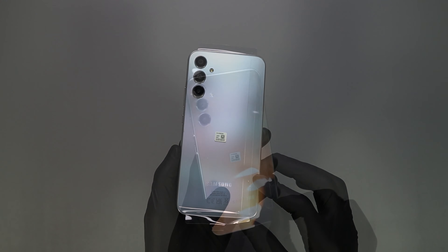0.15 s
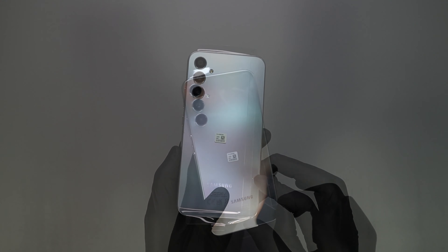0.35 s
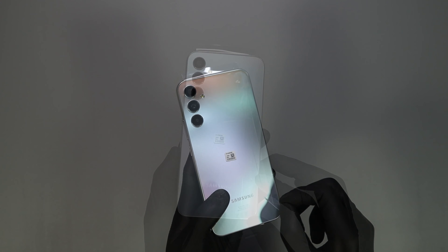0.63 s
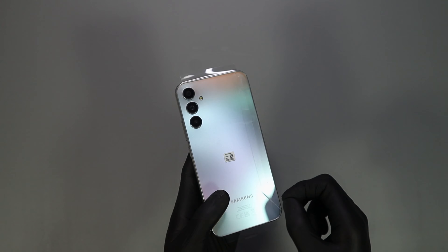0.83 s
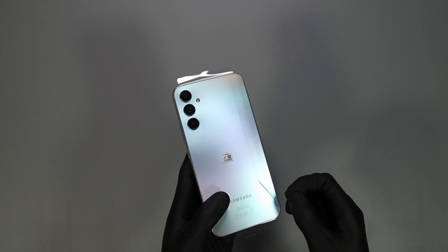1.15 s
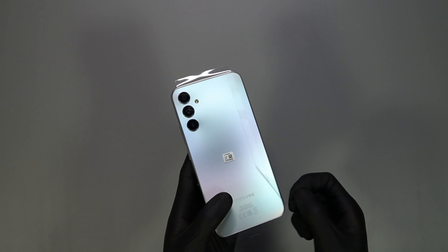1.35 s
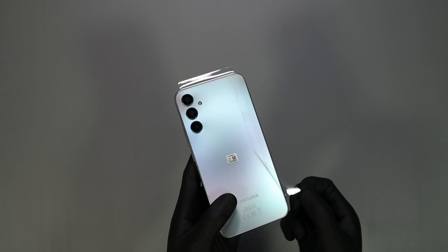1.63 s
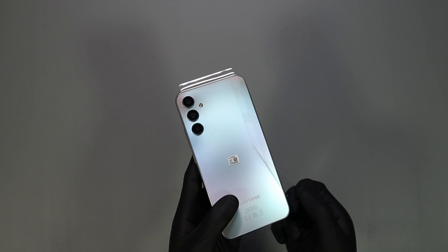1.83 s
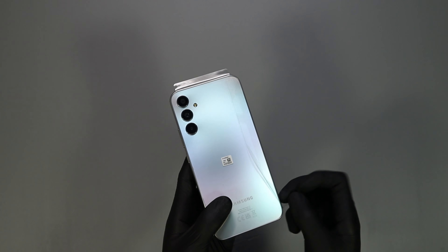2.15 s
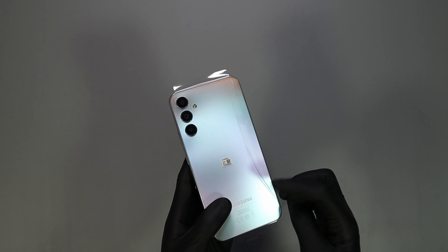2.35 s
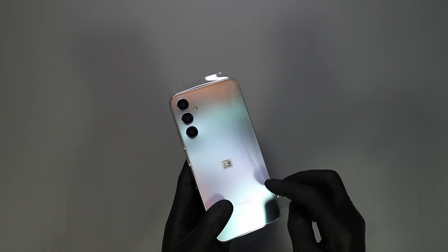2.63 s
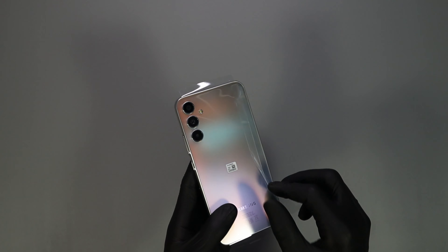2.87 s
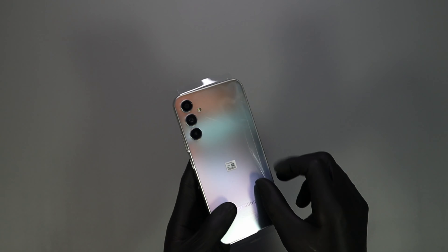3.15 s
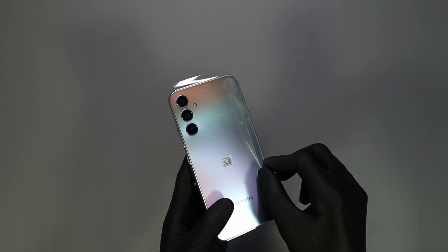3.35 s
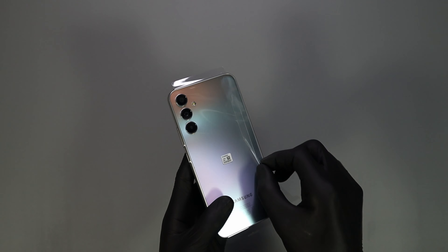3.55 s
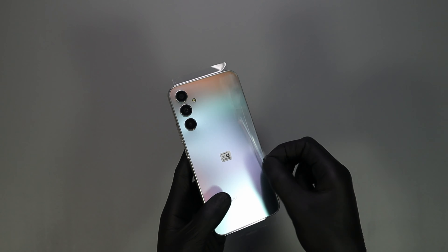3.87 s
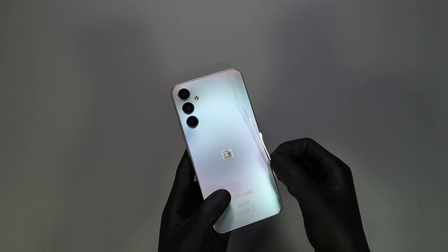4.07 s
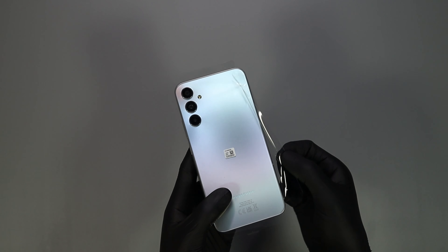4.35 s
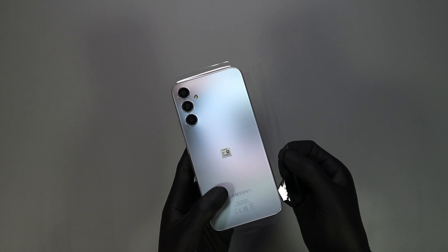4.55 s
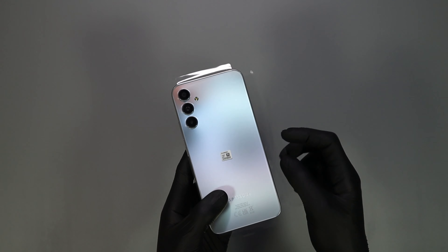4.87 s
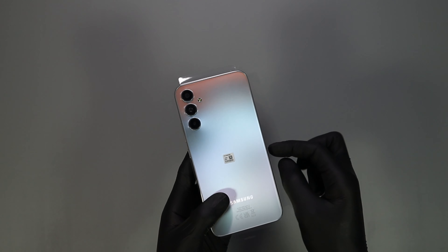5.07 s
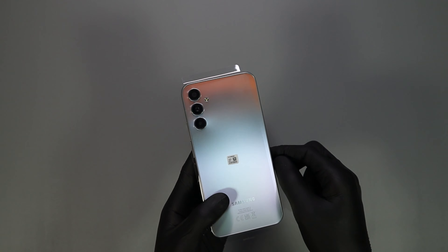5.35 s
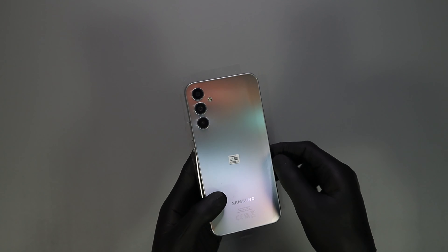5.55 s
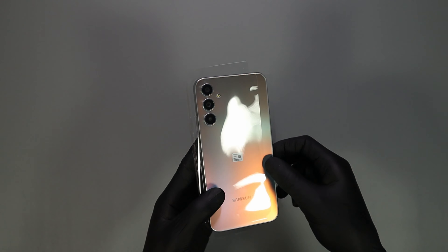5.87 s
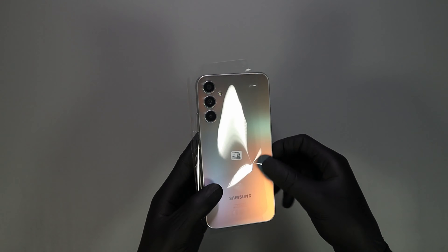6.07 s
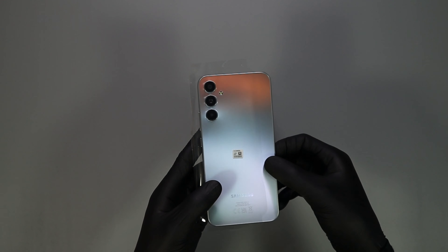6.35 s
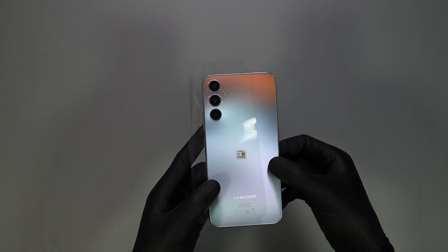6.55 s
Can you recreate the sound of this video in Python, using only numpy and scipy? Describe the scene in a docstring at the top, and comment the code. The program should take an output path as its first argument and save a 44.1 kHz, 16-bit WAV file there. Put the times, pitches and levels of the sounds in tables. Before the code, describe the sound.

Close up in a small, quiet room with faint air noise and a very low hum, gloved hands peel thin plastic film from a phone. At 0.3 s there is a soft fizz and faint chirp, a thin hiss, and a tiny tick near 0.46. Light sliding and sparse ticks continue, with crisper snaps and flap pops at 1.57, 1.73 and 2.03. Small crackles lead to a fuller pop at 2.8 and a sharp snap at 3.2. From 3.65 the crinkling thickens, with a brief squeak at 3.97, bright snaps at 4.36 and 4.43, and the loudest crackling burst at 4.57 with a low thump and hollow ring. Smaller snaps follow at 4.7 and 4.88, and a short rip at 5.24. Dry, buzzy rips come at 5.76-5.9, 6.14, 6.3 and 6.5, with light clicks, and glove rubbing and fizz rise toward the end. Snaps leave short room tails.

```python
"""Gloved hands peel a thin protective film off a phone, heard close up in a small, quiet room.
Over faint air noise and a hum, the sheet hisses as it slides and chirps now and then: filtered random grains
and short wavering tones. Soon creases snap (bursts of pulses striking a ringing sheet) and the flap pops.
The film jumps free with low thumps, then lets go in short stick-slip rips while the gloves rub on.
The table answers each snap and rip at once, and the room adds a short tail to all sounds but the thumps."""
import sys
import numpy as np
from scipy import signal
from scipy.fft import rfft, irfft
from scipy.io import wavfile
from scipy.ndimage import uniform_filter1d

SR = 44100
rng = np.random.default_rng(int(sys.argv[2]) if len(sys.argv) > 2 else 0)


def to_wav(s):
    """Save 16-bit WAV."""
    ch = np.atleast_2d(s).T  # columns
    pcm = np.round(np.clip(ch, -1, 1) * 32767)  # PCM
    wavfile.write(sys.argv[1], SR, pcm.astype(np.int16))


N = 295911
TIME = np.arange(N) / SR  # seconds
SIZE = 8192  # length of one snap, pop or rip in samples

# Limits of the six pitch ranges: thump, body, pop, crack, sizzle and air. Each entry: limit in Hz.
REGISTER_HZ = [180, 480, 1100, 2300, 5500, 9000, 16000]


def undb(db):
    """Turn decibels into a gain."""
    return 10 ** (np.asarray(db) / 20)


def unit(x):
    """Scale a sound to an rms level of 1."""
    return x / np.sqrt(np.mean(x ** 2))


def across(points, size):
    """Read a curve of (Hz, value) points at every frequency of a transform."""
    hz, value = np.transpose(points)
    return np.interp(np.log(np.fft.rfftfreq(size, 1 / SR) + 1), np.log(hz), value)


def colour(x, points):
    """Filter a sound to a curve of (Hz, dB) points, with nothing sounding ahead of its cause."""
    size = len(x) + len(x) % 2
    cepstrum = irfft(np.log(undb(across(points, size))))
    # folding the second half onto the first makes the filter react only afterwards
    cepstrum[1:size // 2] *= 2
    cepstrum[size // 2 + 1:] = 0
    response = np.exp(rfft(cepstrum))
    return irfft(rfft(x, size) * response)[:len(x)]


def walk(rate):
    """Wander smoothly at random, with a spread near 1 and about `rate` new values per second."""
    k = int(SR / rate)
    steps = np.repeat(rng.standard_normal(N // k + 1), k)
    smooth = uniform_filter1d(uniform_filter1d(steps, k), k)
    return 1.28 * smooth[:N]


def add(out, s, pair, ms):
    """Mix in the near sound from time s, and the room's share from the middle of the event."""
    for lane, x, start in zip(out, pair, (s, s + ms / 2000)):
        i = int(start * SR)
        lane[i:i + len(x)] += x[:N - i]


def background():
    """Low rumble and soft hiss from filtered noise, plus a hum that wavers in pitch and level."""
    # Colour of the still air. Each row: frequency in Hz, level in dB.
    air_colour = [(15, -40.5), (25, -7), (92, -5), (170, -4.5), (200, -5), (236, -11.5), (373, -10),
                  (503, -13.5), (607, -16.5), (659, -17.5), (775, -17.5), (1700, -23.5), (5280, -25.5),
                  (8360, -26), (16000, -33)]
    air_db, hum_hz, hum_db = -67, 201.7, -73
    air = unit(colour(rng.standard_normal(N), air_colour)) * undb(air_db + 0.69 * walk(19.0))
    hum = np.sin(2 * np.pi * np.cumsum(hum_hz + walk(8.8)) / SR)
    return air + unit(hum * undb(2.5 * walk(8))) * undb(hum_db)


def room(x, wet_db=-7.5, build_s=0.0039, wall_s=0.014, wall_db=-21):
    """A dense tail builds up and dies at its own pace in each pitch range; one wall adds a single echo."""
    # Tail of the room. Each row: frequency in Hz, level in dB relative to wet_db, time to fall 60 dB in seconds.
    tail_bands = [(120, 1, 0.58), (350, -1.5, 0.49), (800, 1.5, 0.19), (1710, 1.5, 0.34),
                  (3560, -0.5, 0.34), (5770, -0.5, 0.4), (10000, 1.5, 0.31), (15000, -2.5, .22)]
    size = 4 * SIZE
    t = np.arange(size) / SR
    noise, tail = rfft(rng.standard_normal(size)), 0
    band_hz = np.array(tail_bands)[:, 0]
    for own, (_, db, t60) in zip(np.eye(len(tail_bands)), tail_bands):
        # each band fades into its neighbours
        band = irfft(noise * across(np.column_stack([band_hz, own]), size))
        build = 1 - np.exp(-(t / build_s) ** 2)
        decay = np.exp(-np.log(1000) * t / t60) * build
        tail = tail + undb(db + wet_db) * band * decay / np.sqrt(np.sum(decay ** 2))
    tail[int(wall_s * SR)] += undb(wall_db)
    return signal.fftconvolve(x, tail)[:N]


def jolts(thud_t60_s=0.18, rise_s=.003):
    """A soft thud, a bounce of the phone's mass on the gloves, and the ring of the hollow under the palm."""
    # The phone jolts as film pops free. Each row: start in seconds, thud level in dB, hollow ring level in dB.
    jolt_rows = [(2.796, -72, -33.5), (4.574, -35.5, -22), (4.881, -64, -37), (5.243, -48, -41.5)]
    # Colour of the thud. Each row: frequency in Hz, level in dB.
    thud_colour = [(20, -31), (48, -10), (70, -23.5), (115, -8), (170, -0.5), (400, -27.5)]
    hollow_hz, hollow_t60_s = 349.5, 0.13
    bounce_hz, bounce_db, bounce_t60_s = 68, 1, 0.12  # level relative to the thud
    thud_gain, ring = np.zeros((2, N))
    for s, thud_db, ring_db in jolt_rows:
        age = np.maximum(TIME - s, 0)
        rise = 1 - np.exp(-age / rise_s)
        thud_gain += undb(thud_db - 60 * age / thud_t60_s) * rise
        hollow = (hollow_hz, ring_db, hollow_t60_s)
        bounce = (bounce_hz, thud_db + bounce_db, bounce_t60_s)
        for hz, db, t60 in hollow, bounce:
            ring += undb(db - 60 * age / t60) * rise * np.sin(2 * np.pi * hz * age)
    return thud_gain * unit(colour(rng.standard_normal(N), thud_colour)) + ring


def squeaks(wobble=0.043):
    """The film skids on the case: very fast stick-slip makes a rough, short tone."""
    # Brief chirps. Each row: start in seconds, duration in seconds, average pitch in Hz, level in dB.
    chirps = [(.31, 0.076, 3800, -70.5), (2.315, 0.037, 4100, -61), (3.965, 0.016, 4900, -44.5),
              (3.975, .025, 5040, -57)]
    out = np.zeros(N)
    waver = 1 + wobble * walk(900)
    for s, length, hz, db in chirps:
        i, n = int(s * SR), int(length * SR)
        swell = np.sqrt(2 * np.hanning(n))
        tone = np.sin(2 * np.pi * np.cumsum(hz * waver[i:i + n]) / SR)
        out[i:i + n] += undb(db) * swell * tone
    return out


def strokes(table, depth_db=13.5):
    """Gain of hand strokes that rise and fall evenly in dB, covering depth_db in each rise or fall time."""
    power = 0
    for s, rise, fall, db in table:
        away = np.maximum((s - TIME) / rise, (TIME - s) / fall)
        power = power + undb(db - depth_db * np.minimum(away, 10)) ** 2
    return np.sqrt(power)


def grains(rate, spread_db):
    """Tiny releases at random moments (`rate` per second on average), a few much larger than the rest."""
    sizes = undb(spread_db * np.minimum(rng.exponential(size=N), 5))
    return (rng.random(N) < rate / SR) * sizes * rng.choice([-1, 1], N)


def sliding(catch_db=-7, tick_db=-5):
    """The film's edge sings and catches on the case, the clinging face fizzes, and the gloves rub in bursts."""
    # Strokes: the edge glides on the case, the clinging face is pulled away, a glove shifts its grip.
    # Each row: peak in seconds, rise in seconds, fall in seconds, peak level in dB.
    glide_rows, pull_rows, rub_rows = [(.41, .02, 0.011, -59.5), (.87, .03, 0.13, -65),
                                       (1.03, 0.16, 0.29, -61.5), (1.43, .2, .17, -60),
                                       (1.9, .05, 0.15, -67.5), (3.8, .07, 0.32, -61),
                                       (4.08, .16, 0.12, -55.5), (4.38, .025, .1, -55.5),
                                       (4.52, 0.13, 0.16, -53), (4.93, .07, .04, -60.5),
                                       (5.215, .018, 0.11, -59), (5.47, .08, 0.14, -69.5)], [(.245, .03, 0.025, -68.5), (.34, 0.045, .04, -63.5),
                                                       (1.04, 0.2, 0.13, -66), (1.52, 0.25, 0.48, -60.5),
                                                       (1.72, .1, 0.087, -62.5), (2.71, 0.034, 0.034, -64),
                                                       (3.45, 0.42, 0.073, -70), (3.78, 0.065, 0.67, -58),
                                                       (4.15, 0.61, .35, -61.5), (4.52, 0.23, 0.17, -57.5),
                                                       (5.42, 0.078, 0.42, -69.5),
                                                       (5.93, 0.16, 0.24, -69.5), (6.57, 0.374, 0.34, -64),
                                                       (6.705, 0.037, .1, -53)], [(.57, 0.1, 0.13, -71),
                                                                      (2.28, 0.11, 0.21, -67.5),
                                                                      (4.02, 0.12, .16, -61),
                                                                      (4.36, 0.075, 0.076, -59),
                                                                      (4.54, 0.048, 0.21, -56),
                                                                      (4.93, 0.054, 0.042, -51.5),
                                                                      (5.215, 0.012, 0.16, -63),
                                                                      (5.47, 0.069, 0.15, -68.5),
                                                                      (5.92, 0.3, 0.2, -62),
                                                                      (6.45, 0.21, .3, -58.5),
                                                                      (6.69, 0.048, .1, -54)]
    # Colours of the edge, the fizz and the rub. Each row: frequency in Hz, level in dB.
    edge_colour, fizz_colour, rub_colour = [(3000, -44.5), (4500, -41.5), (5800, -9), (7100, 0.5),
                                            (8000, -4), (9200, -14.5), (12000, -27.5)], [(150, -26.5), (500, -14), (1700, -8.5), (5000, 2),
                                                          (10000, 4), (13000, 4.5), (16000, -0.5)], [(60, -26), (200, -6), (600, 2),
                                                                        (1800, -1.5), (4200, -0.5),
                                                                        (6000, -4.5), (9000, -29),
                                                                        (16000, -38)]
    cling_db, grip_db = -78, -81  # fizz and rub that go on while the phone is just held
    glide = strokes(glide_rows)
    pull = np.hypot(strokes(pull_rows), undb(cling_db))
    grip = np.hypot(strokes(rub_rows), undb(grip_db))
    fine, medium, coarse = grains(12000, 2.5), grains(6000, 3.2), grains(1800, 3.6)
    catches, lone = grains(110, 2), grains(70, 3)
    bursts_db = 3.5 * walk(130)
    edge_grains = unit(fine) + undb(catch_db) * unit(catches)
    edge = unit(colour(edge_grains, edge_colour)) * glide * undb(1.1 * walk(34))
    fizz = unit(colour(medium, fizz_colour)) * pull * undb(1.1 * walk(14))
    rub = unit(colour(coarse, rub_colour)) * grip * undb(bursts_db + 0.69 * walk(30))
    ticks = unit(colour(lone, fizz_colour)) * pull * undb(tick_db)
    return edge + fizz + rub + ticks


def pops():
    """The loose flap flips through and rings for a few cycles; being small, it radiates little bass."""
    # Flips like a small damped drum. Each row: start in seconds, peak in dB ahead of the filter below,
    # pitch in Hz, width of the resonance in Hz.
    flips = [(1.571, -28.5, 1800, 646), (1.733, -29, 1300, 1100), (2.0274, -27.5, 1620, 850),
             (2.1831, -42, 1670, 298), (2.3671, -40.5, 1640, 293), (2.7964, -26.5, 800, 330),
             (3.2077, -24.5, 1730, 1010), (3.79, -16.5, 1450, 900), (4.0512, -34, 1710, 500),
             (4.5735, -9.5, 700, 280)]
    out = np.zeros((2, N))
    t = np.arange(SIZE) / SR
    for s, db, hz, width in flips:
        age = t * width * np.pi * np.sqrt(2)
        swell = age * np.exp(1 - age)  # peaks at 1
        ring = undb(db) * swell * np.sin(2 * np.pi * (hz * t + rng.random()))
        ring = colour(ring, [(100, -28), (400, -16), (850, 1.5)])
        add(out, s, (ring, ring), 0)
    return out


def registers(db, low_hz, high_hz, law):
    """Share a level among the registers: a larger patch reaches lower, a quicker flip reaches higher."""
    below_db, above_db, tilt_db = law
    edges = np.array(REGISTER_HZ)
    centres = np.sqrt(edges[1:] * edges[:-1])
    octaves_below = np.log2(np.hypot(1, low_hz / centres))
    octaves_above = np.log2(np.hypot(1, (centres / high_hz) ** 2)) / 2
    shape = np.array(tilt_db) - below_db * octaves_below - above_db * octaves_above
    return db + shape - 10 * np.log10(np.sum(undb(shape) ** 2))


def voice(x, register_db, count=3):
    """Steer each register towards its wanted level, then cut the bass, which a sheet hardly radiates."""
    edges = np.array(REGISTER_HZ)
    centres = np.sqrt(edges[1:] * edges[:-1])
    bins = (edges * SIZE / SR).astype(int)
    for _ in range(count):  # the filter is smooth, so it takes a few rounds to come close
        energy = np.diff(np.cumsum(np.abs(rfft(x)) ** 2)[bins]) * 2 / SIZE
        have_db = 10 * np.log10(energy / (.005 * SR))  # level if spread over 5 ms
        x = colour(x, np.column_stack([centres, register_db - have_db]))
    return colour(x, [(30, -35.0), (80, -20.0), (150, -15.0), (235, -6.5), (320, 0), (16000, -1.5)])


def sheet(patch=0.13, patch_s=0.00036):
    """Response of one spot of film: a spike, the quick flutter of its own patch, then ringing modes."""
    # What the sheet and the phone under it ring with.
    # Each row: average pitch in Hz, average level in dB relative to the spike, time to fall 60 dB in seconds.
    ring_modes = [(359.2, -51.5, 0.11), (583, -44.5, 0.024), (735, -29, 0.027), (1590, -50, 0.083),
                  (1650, -53, 0.081), (1706, -33.5, 0.017), (1952, -48.5, .1), (3100, -31, 0.0086),
                  (3416, -47.5, 0.035), (4280, -52, 0.087), (5180, -46.5, 0.0066), (7010, -31.5, 0.00055)]
    t = np.arange(SIZE) / SR
    h = signal.unit_impulse(SIZE) + patch * rng.standard_normal(SIZE) * np.exp(-t / patch_s)
    # tension in the sheet differs from spot to spot
    scatter = rng.standard_normal((len(ring_modes), 2))
    for (hz, db, t60), (detune, share) in zip(ring_modes, scatter):
        h += undb(db + 2 * share - 60 * t / t60) * np.cos(2 * np.pi * hz * (1 + 0.0035 * detune) * t)
    return h


def strike(pulses, register_db, shade, flutter, flutter_s, table_share, table_s=.00085):
    """Pulses strike film of a given shade; returns the sound to the listener and the sound into the room."""
    t = np.arange(SIZE) / SR
    spot = colour(sheet(), shade)
    # bending waves run out and die at once, and the table answers after about a millisecond
    path = flutter * rng.standard_normal(SIZE) * np.exp(-t / flutter_s)
    path[0] += 1
    path[int(SR * table_s * rng.uniform(.85, 1.15))] += table_share
    spread = signal.fftconvolve(pulses, path)[:SIZE]
    near = signal.fftconvolve(spread, spot)[:SIZE]
    # the room gathers all directions, so the pulses' interference evens out there
    return np.array([voice(near, register_db), voice(spot, register_db)])


def rips(jitter=0.2, around_db=1, slowing=0.14, parting_s=.0007):
    """The peel front sticks and slips hundreds of times a second; each run swells, slows and eases off."""
    # The film unsticks. Each row: start in seconds, duration in ms, slips per second at the start,
    # level in dB ahead of the bass cut, lowest Hz, highest Hz.
    rip_rows = [(5.231, 5.5, 1000, -40, 700, 8930), (5.238, 4.7, 730, -31, 700, 7500),
                (5.759, 21.2, 915, -29, 1189, 7310), (5.7791, 18.2, 504, -32, 1050, 6600),
                (5.8, 17, 430, -38, 1070, 8150), (5.873, 6.9, 710, -43.5, 700, 3440),
                (5.901, 13.8, 770, -36, 1390, 3560), (6.136, 10.7, 1150, -28.5, 950, 4500),
                (6.291, 8.2, 980, -35.5, 1920, 2560), (6.328, 9.1, 660, -41.5, 1607, 2140),
                (6.4985, 11, 1010, -34, 785, 3100)]
    # Film pulled tight has two broad resonances. Each row: frequency in Hz, level in dB.
    taut_colour = [(1200, -1), (1750, 1.5), (2500, 3), (3400, -2), (4500, 6.5), (5700, 3), (6600, -2)]
    # How rips radiate: loss below the lowest Hz and above the highest Hz, both in dB per octave,
    # then a list with the tilt of each register in dB.
    radiation = (15.6, 20.8, [6, -1, -1.5, 4.5, 0.5, 3])
    out = np.zeros((2, N))
    for s, ms, rate, db, low_hz, high_hz in rip_rows:
        slips, done = np.zeros(SIZE), 0  # done: share of the rip that is over
        while done < 1:
            slips[int(done * ms * SR / 1000)] = .5 + np.sin(np.pi * done)
            rate_now = rate * (1 - slowing * done)
            done += 1000 / (ms * rate_now) * np.exp(jitter * rng.standard_normal())
        # after every slip the adhesive keeps parting, dying away within milliseconds
        fading = signal.lfilter([.25], [1, -np.exp(-1 / (parting_s * SR))], slips)
        parting = fading * rng.standard_normal(SIZE)
        register_db = registers(db, low_hz, high_hz, radiation)
        near, around = strike(slips + parting, register_db, taut_colour,
                              flutter=0.18, flutter_s=0.00044, table_share=0.3)
        add(out, s, (near, around * undb(around_db)), ms)
    return out


def snaps(follow=0.12, per_ms=2.2):
    """A crease flips in a quick avalanche of tiny buckles; in short snaps the first one dominates."""
    # A crease buckles. Each row: start in seconds, duration in ms, level in dB ahead of the bass cut,
    # lowest Hz that its patch radiates, highest Hz that its flip reaches.
    snap_rows = [(.4568, 0.76, -44.5, 5700, 9800), (.625, 1.3, -58.5, 1800, 9050),
                 (.87, 0.5, -60, 3900, 11000), (1.1044, 0.43, -55, 6500, 9400),
                 (1.2293, 0.97, -53, 960, 11100), (1.3582, 0.69, -46.5, 1500, 12000),
                 (1.4337, 0.6, -40, 2950, 9700), (1.571, 0.91, -34.5, 1590, 9000),
                 (1.715, 0.31, -44.5, 2320, 9900), (1.734, 0.96, -40.5, 885, 13400),
                 (1.7848, 0.23, -43.5, 2600, 9000), (1.861, 1, -55, 3000, 9500),
                 (2.0283, 0.78, -32, 1510, 6430), (2.1828, 2.3, -48.5, 850, 8750),
                 (2.2586, 2.7, -46.5, 2400, 12800), (2.3291, 2.6, -55, 1310, 5030),
                 (2.3672, 1.5, -53, 1300, 5850), (2.4879, 2.4, -56, 1410, 1760),
                 (2.7951, 2.9, -28, 560, 6600), (3.0336, 2.04, -56.5, 3200, 5500),
                 (3.2087, 1.58, -23.5, 2200, 6500), (3.644, 0.84, -50, 3500, 12000),
                 (3.692, 0.32, -48, 1500, 9400), (3.7189, 0.31, -46.5, 1370, 9500),
                 (3.7654, .6, -45.5, 5000, 10000), (3.788, 1.88, -28, 880, 14000),
                 (3.8577, 1.27, -46, 775, 9400), (3.9632, 5.3, -40, 3600, 7540),
                 (4.0214, 2.4, -30, 2400, 7700), (4.0493, 2, -41.5, 1400, 3500),
                 (4.0691, 1.8, -40, 950, 5800), (4.148, 0.99, -46, 1800, 4000),
                 (4.1569, 0.69, -31, 3420, 4380), (4.1687, 1.5, -30.5, 1182, 9700),
                 (4.1863, 0.98, -43.5, 1200, 7500), (4.2344, 1.3, -30.5, 2730, 6940),
                 (4.323, 3, -50.5, 350, 6000), (4.3637, 1.8, -20.5, 3200, 8000),
                 (4.417, 2.06, -39.5, 323, 9000), (4.433, 1.32, -23.5, 1010, 10700),
                 (4.459, 2.3, -39, 1220, 7050), (4.5707, 2.37, -19.5, 620, 7700),
                 (4.5726, 5.86, -13, 636, 11000), (4.5833, 6.14, -19.5, 375, 4500),
                 (4.6935, 2.22, -30.5, 665, 7600), (4.7043, 1.9, -30, 1700, 4970),
                 (4.781, 6.7, -42.5, 400, 1000), (4.837, 2, -45, 910, 2920), (4.8439, 1.46, -41, 640, 4500),
                 (4.8797, 3.6, -28, 440, 7400), (4.95, 5.1, -42, 200, 8000), (5.2405, 5.2, -31, 480, 5000),
                 (5.5195, 2, -48, 420, 5070), (5.537, 5.3, -38, 60, 3500), (5.9736, 1.83, -48, 1200, 3700),
                 (6.005, 3.2, -50.5, 850, 4940), (6.119, 2, -48.5, 1000, 8900),
                 (6.136, 1.5, -38.5, 2160, 5700), (6.2896, .8, -28, 2900, 3000),
                 (6.4047, 2, -50.5, 2683, 4426), (6.558, 3.9, -47.5, 833, 1604),
                 (6.5694, 1.2, -47.5, 870, 11000), (6.5904, 1.3, -52, 1900, 8800),
                 (6.6205, 0.58, -38, 2010, 3760)]
    # Broad colour of the bowed sheet over the phone's back. Each row: frequency in Hz, level in dB.
    body_colour = [(250, -2), (360, 2.5), (470, 6.5), (760, -3), (1000, -1), (1280, -3), (1620, 1),
                   (2500, -2), (3200, 1.5), (7500, 6.5), (10000, 0.5), (13000, 3), (16000, -6)]
    # How buckles radiate: loss below the lowest Hz and above the highest Hz, both in dB per octave,
    # then a list with the tilt of each register in dB.
    radiation = (15.06, 22.3, [8.5, 0.83, -3.5, -2.5, 0, 3.15])
    out = np.zeros((2, N))
    for s, ms, db, low_hz, high_hz in snap_rows:
        buckles = np.zeros(SIZE)
        count = 1 + int(ms * per_ms)
        moments = (np.arange(count) + rng.random(count)) / count * ms * SR / 1000
        sizes = rng.uniform(0.19, 3.9, count) * rng.choice([-1, 1], count)
        buckles[moments.astype(int)] = follow * sizes
        buckles[0] = 1 / (1 + (ms / 3) ** 2)
        register_db = registers(db, low_hz, high_hz, radiation)
        pair = strike(buckles, register_db, body_colour,
                      flutter=0.12, flutter_s=0.0019, table_share=0.27)
        add(out, s, pair, ms)
    return out


def scene():
    """The film close by, its room, and the quiet behind it."""
    # sliding and squeaks go equally to the near sound and into the room
    near, around = snaps() + pops() + rips() + sliding() + squeaks()
    return (near + jolts() + room(around) + background())[None]


def record(dry, low_hz=35, top_hz=15900):
    """Cut the deepest rumble gently and the very top steeply."""
    dry = signal.sosfilt(signal.butter(2, low_hz, "high", fs=SR, output="sos"), dry)
    return signal.sosfilt(signal.ellip(8, .2, 70, top_hz, fs=SR, output="sos"), dry)


dry = scene()
out = record(dry)
to_wav(out)
```